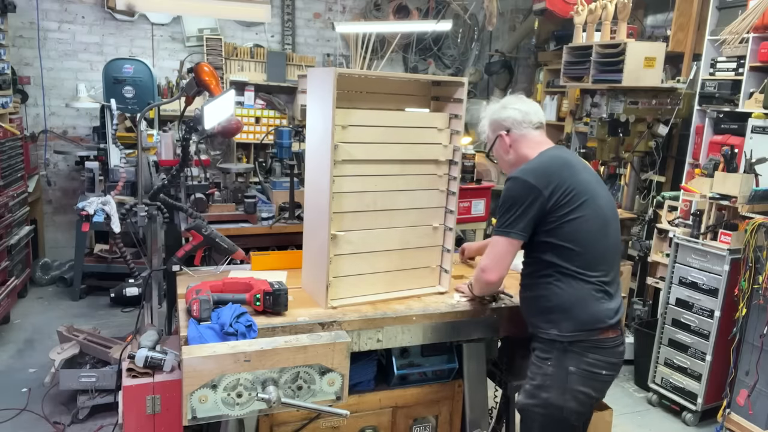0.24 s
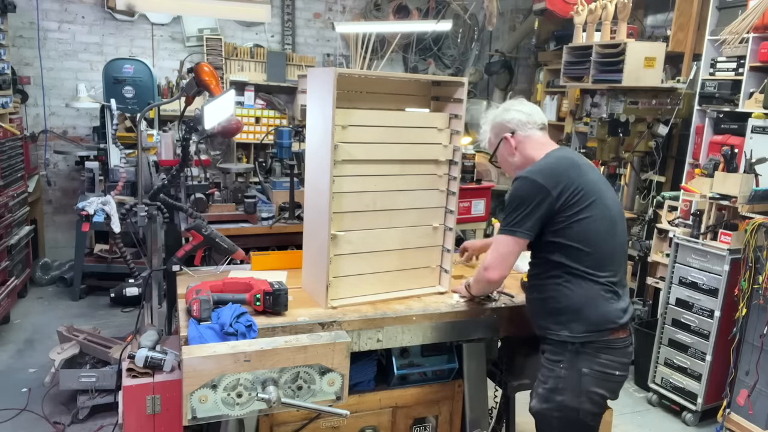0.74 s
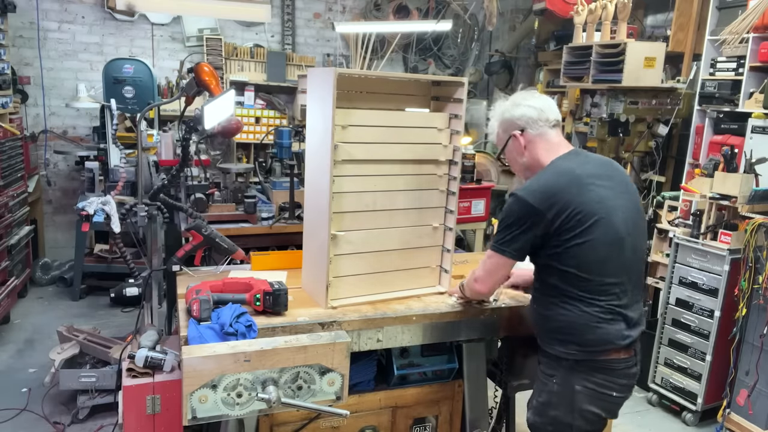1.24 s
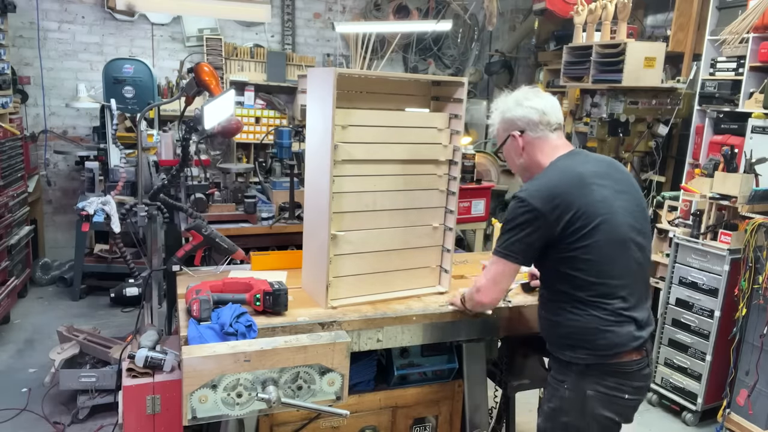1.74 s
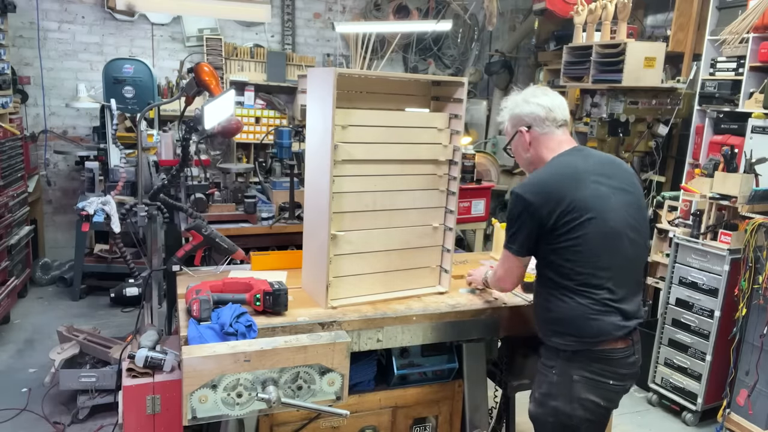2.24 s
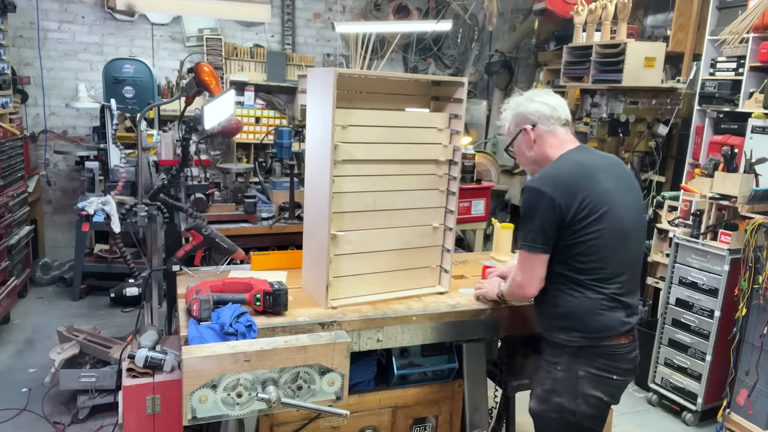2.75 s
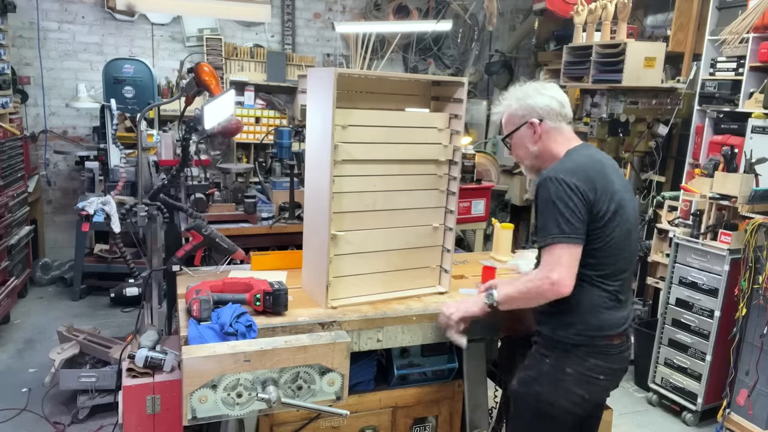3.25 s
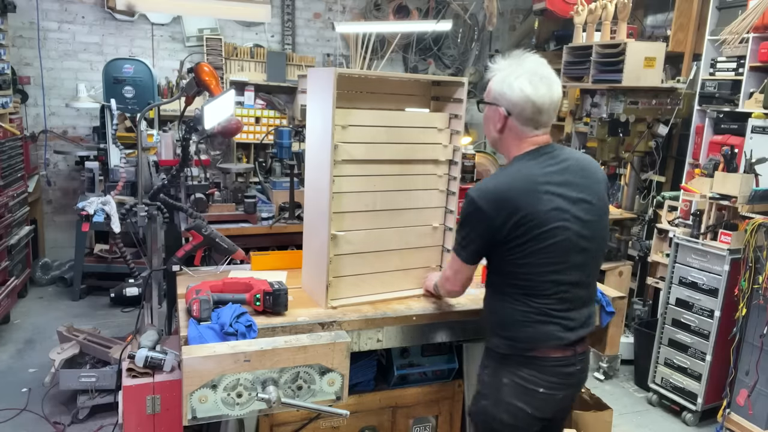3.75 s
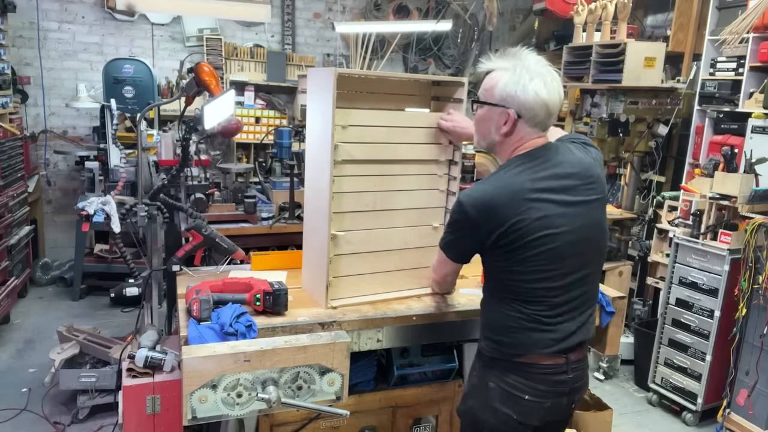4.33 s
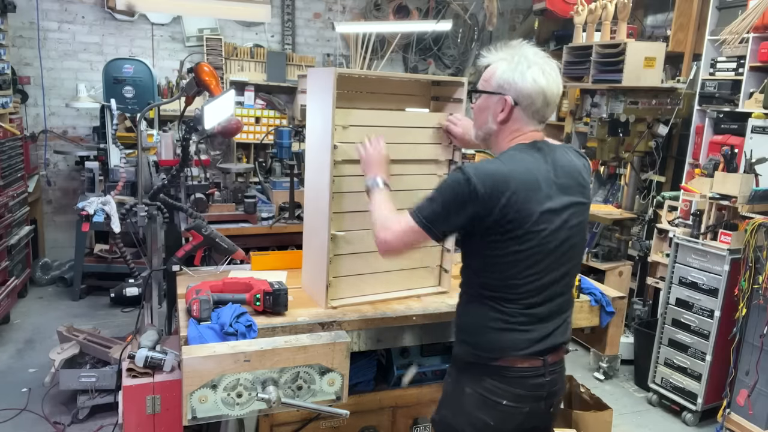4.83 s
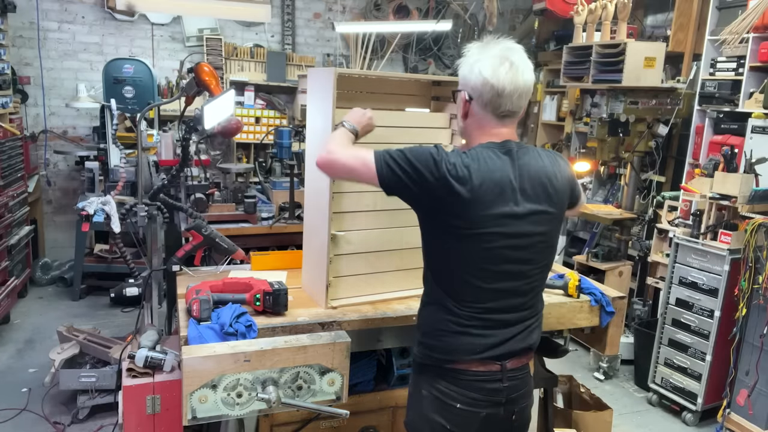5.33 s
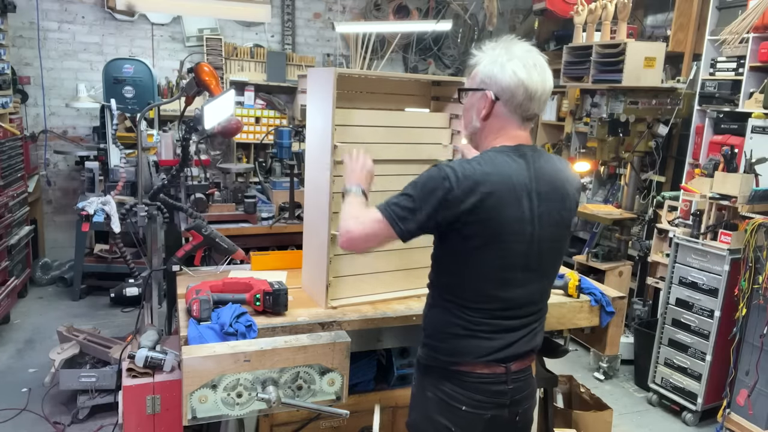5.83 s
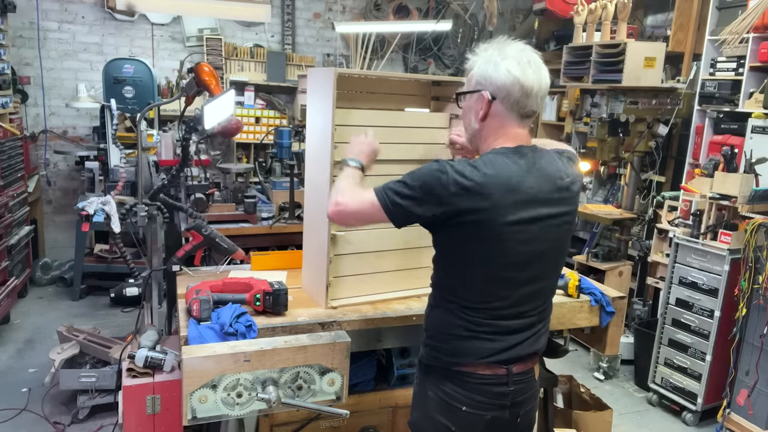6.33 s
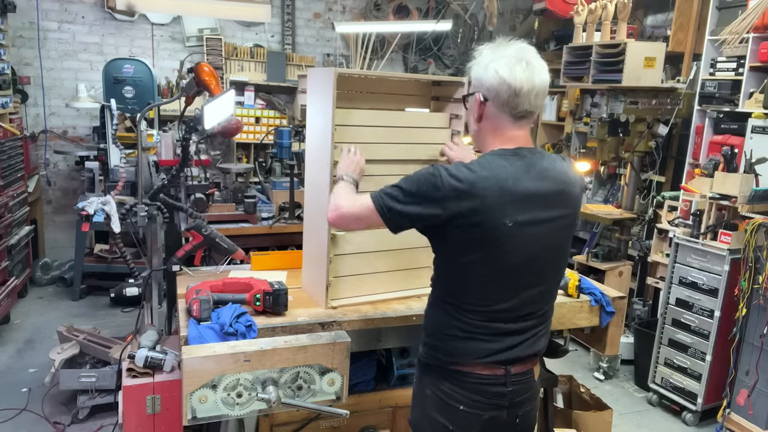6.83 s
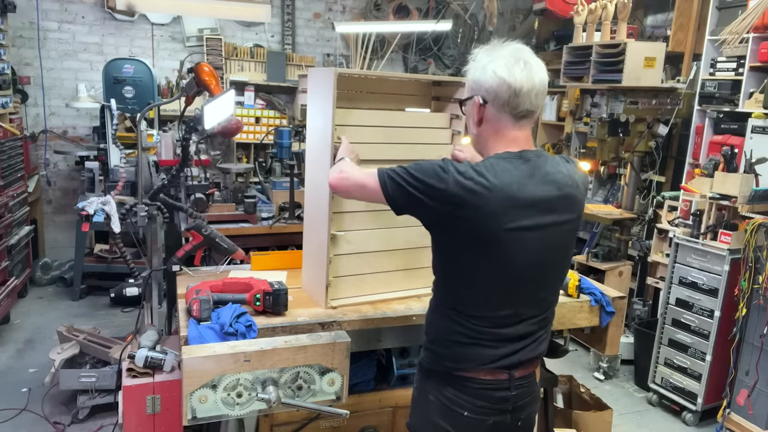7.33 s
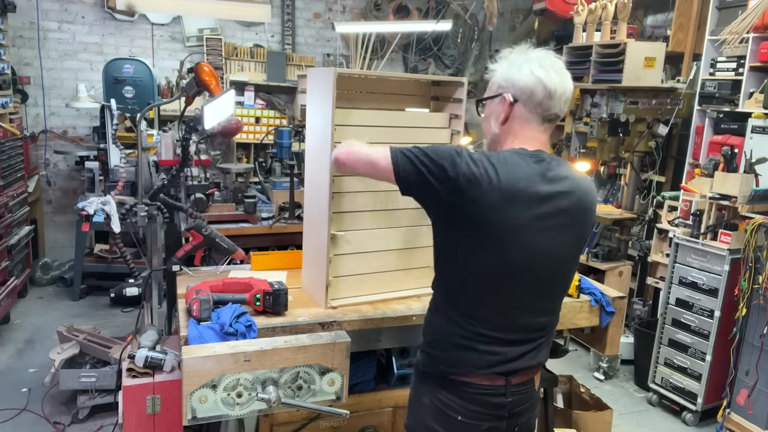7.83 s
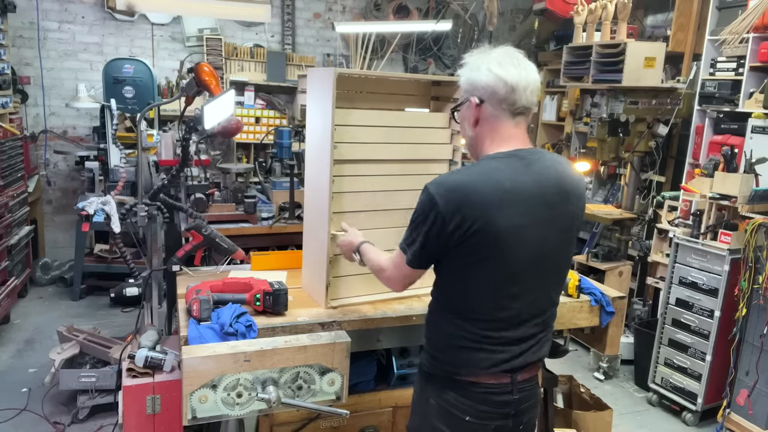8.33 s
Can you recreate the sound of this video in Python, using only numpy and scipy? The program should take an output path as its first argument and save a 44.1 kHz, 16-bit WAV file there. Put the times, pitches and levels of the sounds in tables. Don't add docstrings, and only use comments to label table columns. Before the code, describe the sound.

A quiet workshop with faint low ventilation and electrical hum. A soft dull thud comes at 0.3 seconds, with slight cloth brushing until 1. From 1.2 to 1.9 crisp paper rustles, strongest near 1.6, with a small click and faint squeaks. At about 2.25 a heap of small wooden blocks tips over in a dense, bright, high clatter, rattling on and thinning until 3.1. A thud and scuff at 3.55 precede a short spill and hand clicks from 3.7 to 4.3. Then near quiet, with light touches. A loud, sharp wood knock hits at 5.15, with smaller clicks to 5.6. Another hard knock lands at 6.1, then hollow taps and clicks at 6.4 to 6.8, a knock at 7.06, and a bright little cluster from 7.3 to 7.6. After a soft rub come a bright contact at 8.17 and final knocks and clicks around 8.4 to 8.5. Echoes are short and clipped.

```python
import sys
import numpy as np
from scipy import signal
from scipy.fft import rfft, irfft
from scipy.io import wavfile
from scipy.ndimage import uniform_filter1d

SR = 44100
rng = np.random.default_rng(int(sys.argv[2]) if len(sys.argv) > 2 else 0)


def unload_wav(signal):
    wavfile.write(
        sys.argv[1],
        SR,
        np.round(np.clip(np.atleast_2d(signal).T, -1, 1) * 32767).astype(np.int16),
    )


def to_linear_factor(level_db):
    exponent = np.asarray(level_db, float) / 20
    return 10 ** exponent


N = 377937
T = np.arange(N) / SR
STRIKE_T = np.arange(SR // 14) / SR

# start_s, ring_db, ring_hz, wood_relative_db,
# crack_relative_db
BLOCK_CLICKS = [(.8784, -16, 6720, -77, -47), (1.5678, -8.5, 7230, -32.5, -7),
                (2.2508, -1, 6130, -27.5, -7.5), (2.2643, -3, 6700, -17, -19.5),
                (2.2837, -6, 7900, -25.5, -25.5), (2.298, -4, 8100, -24.5, -28.5),
                (2.3206, -1.5, 7630, -21.5, -25.5), (2.327, -3, 7650, -20, -25.5),
                (2.336, -3.5, 7500, -18, -25), (2.3565, -0.5, 5830, -20, -24.5),
                (2.365, -4.5, 6020, -25, -28.5), (2.3757, -4, 8350, -28.5, -1.5),
                (2.3951, -4.5, 7030, -28.5, -24), (2.408, -8, 7000, -36.5, -20.5),
                (2.4563, -3.5, 7210, -26.5, -30.5), (2.5144, -8.5, 8350, -27, -18.5),
                (2.5467, -9.5, 7400, -13.5, -20), (2.59, -5, 7000, -28, -16),
                (2.5975, 1, 7040, -23.5, -17.5), (2.604, -1.5, 6450, -28, -17),
                (2.613, -11.5, 7100, -18.5, -11.5), (2.6364, -6.5, 7640, -16, -23.5),
                (2.6888, 0.5, 7260, -34, -14.5), (2.6973, -4, 6870, -46, -17),
                (2.709, -14.5, 7300, -32, -11), (2.7357, -12.5, 6900, -30.5, -11.5),
                (2.81, -12.5, 7000, -26, -13.5), (2.822, -17.5, 7100, -28, -15),
                (2.838, -11, 7100, -20.5, -14), (2.875, -11.5, 6700, -22.5, -22.5),
                (2.9057, -15.5, 7000, -25, -14.5), (2.968, -16, 8630, -22, -17.5),
                (2.9736, 0, 8580, -34, -37), (3.0584, -2.5, 8480, -57, -22), (3.067, -7.5, 8500, -40, -27),
                (3.1313, -11.5, 8500, -45, -13), (3.135, -18, 8340, -41, -23.5),
                (3.692, -1, 7510, -45, -8), (3.712, -4, 6710, -36.5, -18.5), (3.8472, -10, 6700, -36, -24),
               (3.866, -12, 6670, -22, -24.5), (3.7639, 4, 6620, -40, -16), (3.7846, -2, 6780, -59.5, -32),
               (3.9555, -18, 6750, -34, -38), (3.98, -8.5, 6664, -27, -8.5),
               (4.0613, -15.5, 6790, -9.5, -6), (4.1806, -17.5, 6800, -35.5, -12),
               (4.1849, 1.5, 6630, -43.5, -16.5), (4.192, -6, 6800, -40, -20),
               (4.2078, -11, 6760, -37, -27.5), (4.3127, -17.5, 6850, -43, -20),
               (5.4795, -5, 7000, -56, -20), (5.509, -28, 7100, -42, -14), (5.573, -7, 7050, -54, -20),
               (5.601, -27, 7400, -33, -37),
                (6.098, -17, 7216, 3.5, -30), (6.2971, -36, 6060, -30, -20), (6.5784, -5.5, 7230, -28, -24),
               (6.588, -10.5, 7130, -25, -18), (6.8074, 3, 7060, -57, -30), (7.3107, 5.5, 6760, -43.5, -25),
               (7.3291, -9.5, 5800, -30, -11), (7.3552, -1, 7660, -30.5, -11.5),
               (7.43, -13, 5950, -20, -22), (7.443, -5, 7500, -26.5, -20.5), (7.45, -8.5, 6065, -24.5, -22),
               (7.4984, -11, 6190, -30, -24), (7.5325, -12, 6080, -30, -12),
               (7.5926, -6.5, 6630, -30.5, -20.5), (8.3989, -15, 6740, -14, -37),
               (8.5136, -3, 6680, -17, -19)]
# start_s, full_flow_s, settling_s, level_db, ring_hz, size_spread_0_to_1
TUMBLES = [
    (2.27, .13, .02, -14, 7200, .25),
    (2.41, .2, 0.36, -18.5, 7130, .1),
    (3.7, .06, .02, -17, 7200, .3),
    (3.76, 0.11, 0.1, -16, 6690, .05),
    (7.315, .05, .27, -24.5, 6096, .05),
    (7.355, .03, .15, -27, 7580, .05),
    (8.495, .05, 0.048, -23, 6720, .04),
]
# start_s, peak_db, low_knock_relative_db, treble_relative_db, ring_out_s
KNOCKS = [(3.681, -14.5, -29.5, -20, 0.074), (4.0464, -19, -10.5, -6, 0.028), (4.2609, -33, -23, 1, 0.046),
          (5.1479, 2, -24, -9, 0.021), (5.155, -6.5, -18, -10, 0.023), (5.3381, -17, -20, -13.5, 0.13),
          (5.4779, -24.5, -9, 10, 0.026), (5.572, -25, -15.5, 1, 0.011), (6.0975, -1, -14.5, -18.5, 0.017),
          (6.1121, -21, 6, -8, 0.029), (6.127, -14, -6, -20, .03), (6.433, -5.5, -17, -26.5, 0.041),
          (6.438, -8, -17.5, -33.5, 0.034), (6.4447, -12, -5.5, -39, 0.019), (6.576, -23, -14, 4.5, 0.057),
          (7.0614, -8, -9, -11.5, 0.033), (7.0753, -19, -2, 10, 0.02), (7.081, -19, -4, 9, .03),
          (7.096, -20, -4, 6, .03), (7.221, -25, -5.5, -18, 0.07), (7.299, -17.5, -9, -3, 0.025),
          (7.6585, -25, -14.5, -14, .015), (8.1709, -16, -3.5, 4.5, .06), (8.348, -36.5, 1, -10, 0.056),
          (8.3858, -35, -1, -30, 0.033), (8.401, -16, -14, -17, 0.031), (8.4835, -5, -9.5, -7, 0.04)]
# start_s, peak_db, pitch_hz, t60_s
PINGS = [(1.57, -36, 4570, 0.03), (1.571, -26, 8960, 0.049), (5.345, -25, 2986, 0.048),
         (6.113, -21.5, 6010, .05), (6.113, -36.5, 10400, .03), (6.576, -30, 9400, .03),
         (6.576, -34, 10900, .03), (7.13, -23, 2526, .06), (7.095, -23, 2990, .05),
         (8.172, -12.5, 6250, 0.034), (8.172, -15, 8260, .03), (8.531, -17, 2950, 0.063),
         (2.27, -16.5, 3290, 0.042), (2.357, -13.5, 2530, .02), (2.6, -19.5, 3130, .05),
         (2.69, -19, 3170, 0.032), (2.63, -23.5, 3127, 0.035), (2.97, -25, 3840, 0.028),
         (3.066, -33, 3870, 0.032), (3.771, -25, 2985, 0.092), (3.861, -30, 2894, 0.085),
         (4.07, -32, 2880, 0.12), (2.32, -16, 3140, 0.066), (2.39, -11, 3058, 0.029),
         (6.808, -33.5, 3090, .025), (6.833, -33.5, 3090, 0.039), (7.299, -12, 2906, 0.036),
         (8.398, -26, 2900, 0.069), (8.43, -34, 2900, .07), (8.172, -19, 4300, .015),
         (8.505, -17, 2930, .06), (2.335, -15, 3100, .03), (2.52, -21, 3150, .04), (2.85, -26, 3100, .04),
         (8.485, -7.5, 2920, 0.026)]
# pitch_hz, width_hz, level_db
CABINET = [(501, 8.6, 3.5), (1168, 31, -17.5), (1470, 350, -8.5)]
# pitch_hz, width_hz, level_db
PANEL_TREBLE = [(5900, 1200, 5), (7100, 800, 6), (8400, 1100, 4), (9900, 1200, -2)]
# start_s, level_db, centre_hz, length_s
TOUCHES = [(1.228, -60, 7100, 0.028), (1.55, -59.5, 820, 0.076), (1.83, -64, 870, 0.07),
           (1.6, -63, 600, .06), (5.03, -50, 4200, .05), (6.93, -57, 520, .06), (0.284, -56.5, 450, 0.075),
           (0.0029, -68, 5500, 0.063), (3.545, -54, 800, 0.075), (4, -50, 2800, .06),
           (4.622, -42.5, 1780, .05), (4.626, -43.5, 2830, 0.032), (4.627, -54, 640, 0.058),
           (5.21, -36, 520, 0.065), (6.04, -62.5, 1500, 0.058), (6.244, -33, 650, 0.048),
           (6.277, -40, 1320, 0.02), (6.382, -35.5, 1100, 0.064), (6.697, -39.5, 970, 0.04),
           (6.815, -55, 1320, 0.07), (6.2, -58.5, 720, 0.069), (8.172, -28, 2000, 0.055),
           (3.535, -69, 5000, .03), (7.4, -39.5, 510, 0.13), (7.875, -57, 1500, 0.025),
           (7.88, -55.5, 260, 0.075), (7.289, -41, 320, 0.21), (8.172, -27, 435, 0.054),
           (7.065, -26.5, 400, 0.07), (4.74, -63, 6000, 0.054), (4.83, -64.5, 6500, 0.052),
           (4.38, -55, 5100, 0.11)]
# start_s, level_db, pitch_hz, length_s
SQUEAKS = [(1.24, -63, 2100, .05), (1.4, -55, 3350, .09), (1.57, -45, 2000, 0.059),
           (1.785, -48.5, 3400, 0.15), (2.0, -51, 3450, 0.017), (2.07, -60.5, 6900, 0.035),
           (3.571, -43, 1700, 0.063), (3.571, -45, 4500, 0.056), (7.73, -55.5, 3200, 0.074),
           (7.88, -57, 2200, 0.055)]
# start_s, swell_s, fade_s, peak_db, body_relative_db
PAPER = [(0.27, 0.044, 0.2, -60, -3), (1.22, 0.024, 0.17, -48.5, -20), (1.33, 0.063, 0.15, -49.5, -15),
         (1.56, .006, 0.19, -28.5, -8), (1.66, 0.18, 0.1, -26.5, -17), (1.84, 0.074, 0.06, -33.5, -25),
         (2.06, 0.0095, 0.054, -57.5, -11), (3.566, .003, .14, -44, -2), (6.26, 0.11, 0.087, -32.5, -6.5),
         (7.76, 0.15, 0.047, -38, -16)]
# start_s, swell_s, fade_s, peak_db, body_relative_db
SLEEVE = [(0.72, 0.034, 0.27, -44, -20), (.86, 0.045, 0.15, -48.5, -30), (1.38, 0.094, 0.037, -55, -17),
          (1.495, 0.021, 0.1, -26.5, -11), (4.56, 0.098, 0.055, -48.5, -19),
          (5.02, 0.0073, 0.097, -41, -11.5)]
# full_load_s, level_db, deep_relative_db, t60_s
THUDS = [(0.317, -22, -5, 0.21), (.4, -44, 11, 0.18), (1.612, -44.5, -0.5, .3), (1.672, -65.5, 24, 0.13),
         (2.311, -28.5, -16, 0.79), (2.5, -38.5, -20.5, 0.87), (3.588, -26.5, -6, 0.47),
         (3.633, -25, -0.5, 0.22), (3.852, -46.5, -13.5, 0.59), (4.8, -42, -8, .3), (4.845, -42, 8, 0.3),
         (4.959, -58, 19, 0.15), (5.282, -34.5, -18, 0.13), (5.145, -47, -8.5, 0.32),
         (6.118, -27, -28, 0.27), (6.178, -32.5, -19, 0.19), (6.495, -45.5, -22, 0.61),
         (7.091, -27.5, -19, 0.38), (7.19, -53.5, 11, 0.31), (7.404, -38.5, 0, 0.25), (7.48, -33, -5, 0.26),
         (7.538, -49.5, 9, 0.58), (8.193, -24, -37, 0.27), (8.498, -32.5, -30, 0.97),
         (8.56, -54.5, -5.5, .3)]
# pitch_hz, width_hz, level_db
DEEP = [(63, 13, -8), (83, 140, 4)]
# pitch_hz, width_hz, level_db
UPPER = [(136, 21, -7.5), (163.8, 39, 2), (219, 26, -8)]
# centre_hz, t60_s, level_db
ROOM = [(303.7, 0.61, -11), (1040, 0.51, -11), (2780, 0.45, -14.5), (7000, 0.32, -13), (11700, 0.34, -25)]
# pitch_hz, level_per_hz_db
AIR = [(25, -44.5), (45, -7.5), (130, 0), (250, -9), (520, -21.5), (1900, -36), (7000, -36.5),
       (9600, -40.5), (12500, -60)]
# pitch_hz, level_db
HUM = [(123.8, -60.5), (242.2, -67.5), (360.7, -66)]

LOWER_RING, UPPER_RING = .435, 1.68
TOP_HZ = 13300


def unit(x):
    return x / np.sqrt(np.mean(x ** 2))


def band(x, lo_hz, hi_hz, order=2):
    edges_hz = [lo_hz, min(hi_hz, .45 * SR)]
    return signal.sosfilt(signal.butter(order, edges_hz, "bandpass", fs=SR, output="sos"), x)


def resonate(x, modes):
    return sum(to_linear_factor(db) * band(x, hz - width / 2, hz + width / 2, order=1) for hz, width, db in modes)


def walk(rate):
    k = int(SR / rate)
    steps = np.repeat(rng.standard_normal(N // k + 1), k)
    return 1.5 * uniform_filter1d(uniform_filter1d(steps, k), k)[:N]


def fall(t60, rise_s):
    return (1 - np.exp(-STRIKE_T / rise_s)) * np.exp(-np.log(1000) * STRIKE_T / t60)


def lay(times, shapes):
    at = (times * SR).astype(int) + np.arange(len(STRIKE_T))
    return np.bincount(at.ravel(), shapes.ravel(), N + len(STRIKE_T))[:N]


def grit(times, envelopes):
    noise = rng.standard_normal(N)
    ragged = np.sqrt(lay(times, envelopes ** 2)) * noise * to_linear_factor(3.9 * walk(400))
    at = np.minimum((times[:, 0] * SR).astype(int), N - 1)
    strength = np.sqrt(np.sum(envelopes ** 2, axis=1))
    ticks = np.bincount(at, strength * np.sign(noise[at]), N)
    return np.array([ragged, ticks]) + 1e-12 * noise


def plywood(x):
    return to_linear_factor(4.5) * band(x, 330, 2400, order=3) + to_linear_factor(2.0) * resonate(x, CABINET)


def blocks(rows, ring_t60=0.0089, lower_t60=0.038, body_t60=0.032, crack_t60=0.018,
           body_db=6, lower_db=-10, edge_db=-1, upper_db=-19):
    s, db, hz, lower_rel, body_rel, crack_rel = (c[:, None] for c in np.transpose(rows))
    detune = rng.standard_normal((len(rows), 2))
    turn = 2 * np.pi * hz * STRIKE_T
    pair = np.sin(turn) + 0.27 * np.sin(turn * (1 + 0.057 * np.tanh(detune[:, :1])))
    ring = pair * fall(ring_t60, 0.00028)
    lower = np.sin(LOWER_RING * turn * (1 + 0.0086 * detune[:, 1:])) * fall(lower_t60, 0.00023)
    upper = np.sin(UPPER_RING * turn) * fall(ring_t60, 0.00036) * (UPPER_RING * hz < TOP_HZ)
    tone = lay(s, to_linear_factor(db) * (ring + to_linear_factor(upper_db) * upper + to_linear_factor(lower_rel + lower_db) * lower))
    body = grit(s, to_linear_factor(db + body_rel + body_db) * fall(body_t60, 0.0015))
    crack = grit(s, to_linear_factor(db + crack_rel) * fall(crack_t60, 0.00059))
    edge = grit(s, to_linear_factor(db + lower_rel + edge_db) * fall(body_t60, 0.0014))
    rough = plywood(body) + band(edge, 1900, 5800, order=3)
    return tone + rough + to_linear_factor(10.0) * band(crack, 6100, 10600)


def landings(clicks):
    s, db, hz, wood_db, crack_db = np.transpose(clicks)
    lower_db = 6 + 0.61 * wood_db
    return np.transpose([s, db, hz, lower_db, wood_db, crack_db])


def clatter():
    scatter_db, settle_db, dulling = 3.2, 22.5, 0.6
    lower_db, knock_db, crack_db = -9.5, -18.5, -17.5
    rows = []
    for start, flow, settling, db, hz, spread in TUMBLES:
        chance = rng.random((290, 3))
        chance = chance[.8 * chance[:, 0] < flow + settling]
        since = .8 * chance[:, 0]
        loss_db = settle_db * np.clip((since - flow) / settling, 0, 1)
        size_db = db - loss_db - 4.0 - scatter_db * np.log(1 - .97 * chance[:, 1])
        pitch_hz = hz * (1 + spread * (chance[:, 2] - .5))
        same = np.ones(len(since))
        rows.append(np.transpose([start + since, size_db, pitch_hz, lower_db * same,
                                  knock_db + dulling * loss_db, crack_db * same]))
    return np.vstack(rows)


def knocks():
    s, db, low_db, treble_db, t60 = (c[:, None] for c in np.transpose(KNOCKS))
    push = to_linear_factor(db) * fall(t60, 0.00039)
    mid = grit(s, push)
    low = grit(s, to_linear_factor(low_db) * push)
    treble = grit(s, to_linear_factor(treble_db) * push)
    crack = grit(s, to_linear_factor(treble_db - 12) * push)
    hollow = to_linear_factor(8.5) * plywood(low) + to_linear_factor(0.5) * band(mid, 1900, 5000, order=3)
    bright = band(resonate(treble, PANEL_TREBLE), 4900, 10500)
    return hollow + bright + to_linear_factor(-6.5) * band(crack, 9000, 15000)


def pings():
    s, db, hz, t60 = (c[:, None] for c in np.transpose(PINGS))
    rings = np.sin(2 * np.pi * hz * STRIKE_T) * fall(t60, 0.00031)
    return lay(s, to_linear_factor(db) * rings) * to_linear_factor(4.4 * walk(150))


def touches(rows, spread):
    noise = rng.standard_normal(N) * to_linear_factor(2.5 * walk(120))
    out = np.zeros(N)
    for s, db, hz, length in rows:
        near = slice(int(s * SR), int(s * SR) + SR // 3)
        since = np.maximum(T[near] - s, 0)
        scuff = unit(band(noise[near], hz / spread, hz * spread))
        out[near] += to_linear_factor(db + 2.5) * scuff * (1 - np.exp(-since / 0.0015)) * np.exp(-(since / length) ** 2)
    return out


def rub(start, swell, fade):
    near = slice(int(start * SR), int((start + swell + fade) * SR))
    t = T[near]
    from_peak = np.interp(t, [start, start + swell, start + swell + fade], [1, 0, 1])
    edges = np.clip(np.minimum(t - start, start + swell + fade - t) / .01, 0, 1)
    return near, edges * to_linear_factor(-22 * from_peak ** 1.64)


def rustle():
    main, body, sheen = (unit(band(rng.standard_normal(N), lo, hi, order=4)) * to_linear_factor(2.0 * walk(43))
                         for lo, hi in [(4200, 7900), (1805, 4000), (7800, 12000)])
    out = np.zeros(N)
    for strokes, sheen_db in [(PAPER, -8.5), (SLEEVE, -46)]:
        for start, swell, fade, db, body_db in strokes:
            near, stroke = rub(start, swell, fade)
            hiss = main[near] + to_linear_factor(body_db) * body[near] + to_linear_factor(sheen_db) * sheen[near]
            out[near] += stroke * to_linear_factor(db - 7) * hiss
    return out


def thuds():
    deep = unit(band(resonate(rng.standard_normal(N), DEEP), 50, 110, order=3))
    upper = unit(band(resonate(rng.standard_normal(N), UPPER), 95, 265, order=4))
    deep_power = upper_power = 0
    for s, db, deep_db, t60 in THUDS:
        below_peak_db = np.maximum(597.5 * (s - T), 60 * (T - s) / t60)
        load = to_linear_factor(db - below_peak_db) ** 2
        deep_power = deep_power + load * to_linear_factor(deep_db + 3.0) ** 2
        upper_power = upper_power + load
    return np.sqrt(deep_power) * deep + np.sqrt(upper_power) * upper


def room(x):
    t = np.arange(SR // 2) / SR
    tail = 0
    for hz, t60, db in ROOM:
        grain = unit(band(rng.standard_normal(len(t)), hz / 2.0, hz * 1.39, order=1))
        tail = tail + to_linear_factor(db - 25.0) * np.sqrt(hz / 5000) * grain * np.exp(-np.log(1000) * t / t60)
    tail = tail * np.clip(t / 0.0041, 0, 1) * np.exp(-(t / 0.3) ** 4)
    return signal.fftconvolve(x, tail)[:N]


def gate(x):
    threshold_db, lag_s = -44.5, 0.017
    keep = np.exp(-1 / (lag_s * SR))
    power = signal.lfilter([1 - keep], [1, -keep], x ** 2) + np.abs(uniform_filter1d(x ** 2, size=220))
    over = power / to_linear_factor(threshold_db) ** 2
    return x * np.sqrt(over / (1 + over))


def workshop():
    hz, db = np.transpose(AIR)
    f = np.maximum(np.fft.rfftfreq(N, 1 / SR), 1)
    whine_db = 12 * np.exp(-((f - 2550) / 400) ** 2)
    colour = to_linear_factor(np.interp(np.log(f), np.log(hz), db) + whine_db)
    air = unit(irfft(rfft(rng.standard_normal(N)) * colour, N))
    hum = sum(to_linear_factor(d + 2.5 + 2.0 * walk(10.0)) * np.sin(2 * np.pi * h * T) for h, d in HUM)
    return to_linear_factor(-58.5 + 1.0 * walk(2.5)) * air + hum


def scene():
    tumbling = blocks(clatter(), ring_t60=0.018, lower_t60=0.042, body_t60=0.022,
                      lower_db=-6.0, edge_db=5.5, upper_db=-26.5)
    clicks = blocks(landings(BLOCK_CLICKS))
    direct, to_walls = clicks + knocks() + pings() + tumbling
    rubbing = rustle() + touches(TOUCHES, spread=1.356) + touches(SQUEAKS, spread=1.07)
    struck = gate(direct + room(to_walls))
    rubbed = rubbing + to_linear_factor(-10) * room(rubbing)
    return (struck + rubbed + thuds() + workshop())[None]


def roll_off(x):
    return signal.sosfilt(signal.butter(12, 15960, fs=SR, output="sos"), x)


def record(dry):
    before = STRIKE_T[::-1]
    ahead = to_linear_factor(-36.5) * rng.standard_normal(len(before)) * np.exp(-before / 0.0059)
    smear = signal.fftconvolve(band(dry, 410, 4300), ahead[None])[:, len(before) - 1:]
    soft = np.tanh(1.176 * (dry + smear)) / 1.044
    heard = band(band(soft, 53, 12000), 20, TOP_HZ, order=5)
    return roll_off(heard)


dry = scene()
out = record(dry)
unload_wav(out)
```